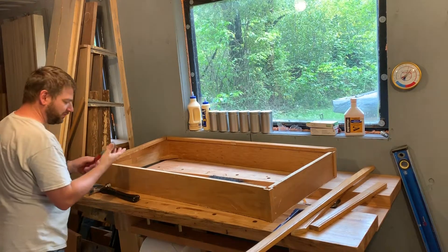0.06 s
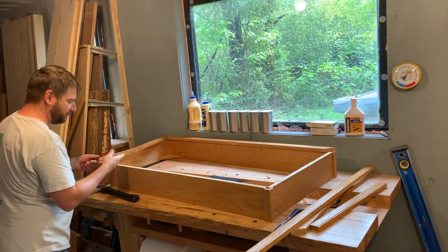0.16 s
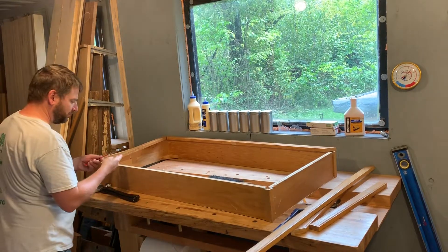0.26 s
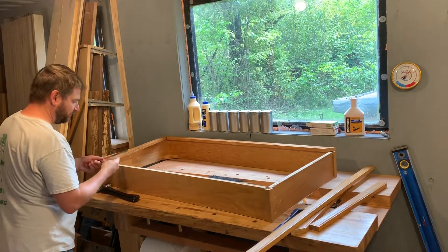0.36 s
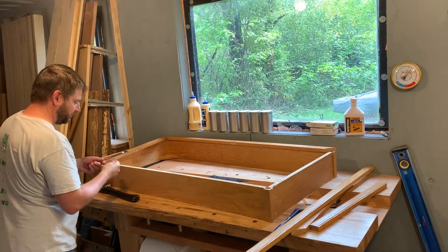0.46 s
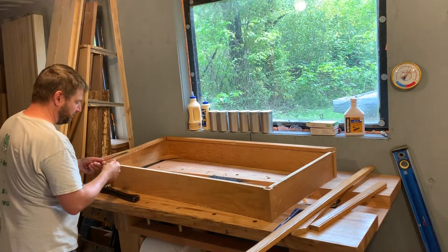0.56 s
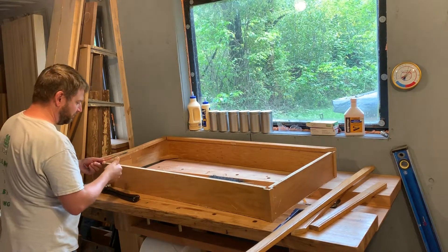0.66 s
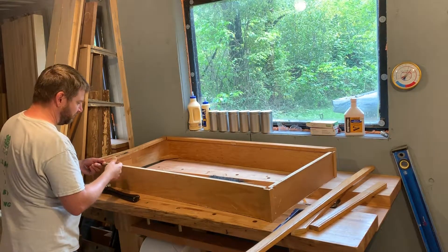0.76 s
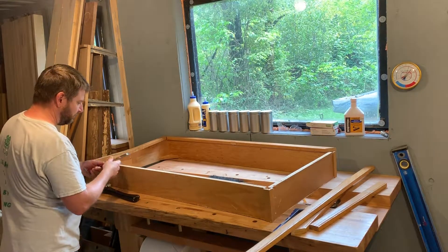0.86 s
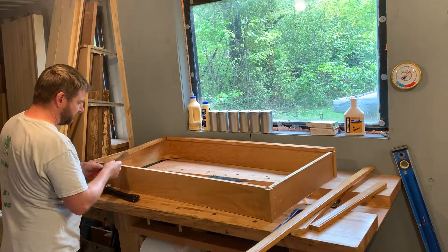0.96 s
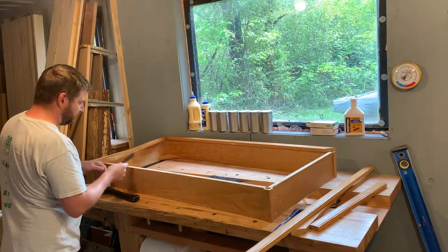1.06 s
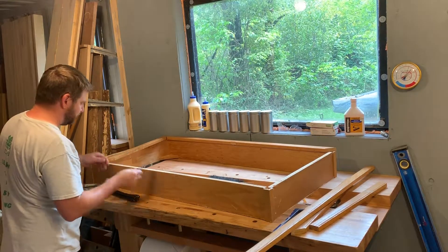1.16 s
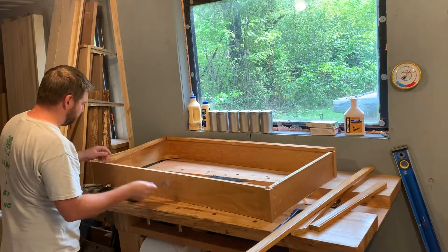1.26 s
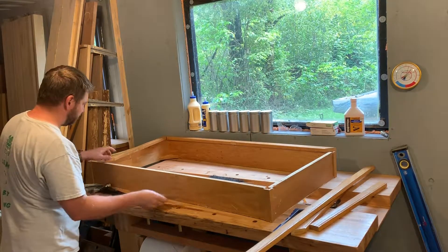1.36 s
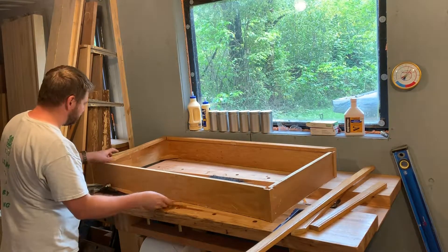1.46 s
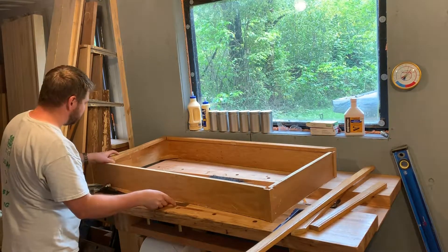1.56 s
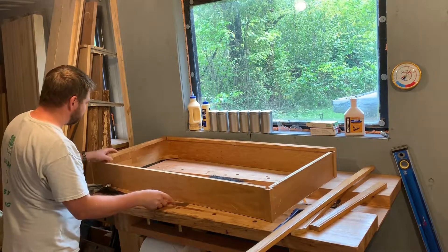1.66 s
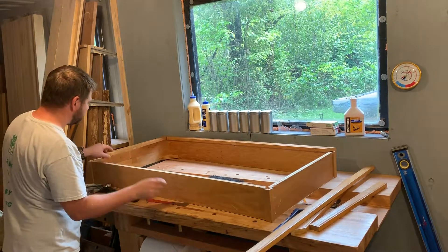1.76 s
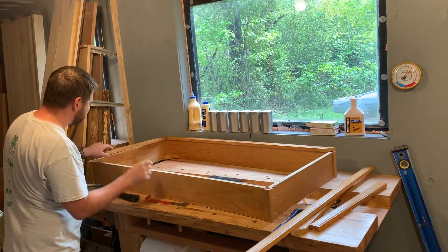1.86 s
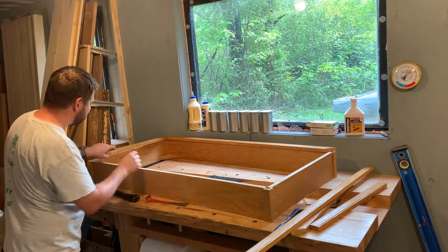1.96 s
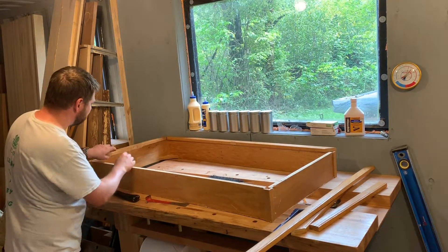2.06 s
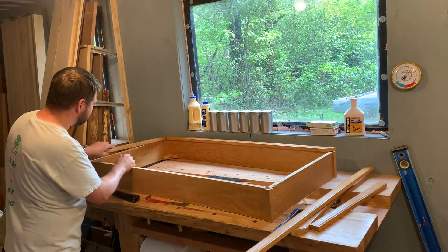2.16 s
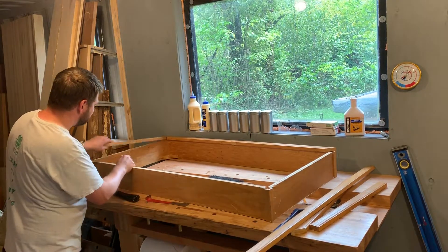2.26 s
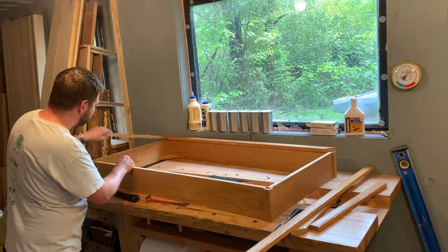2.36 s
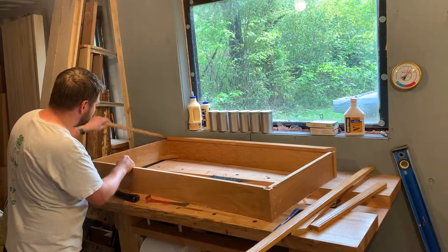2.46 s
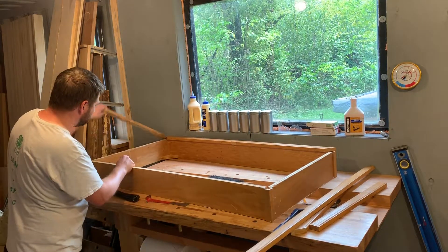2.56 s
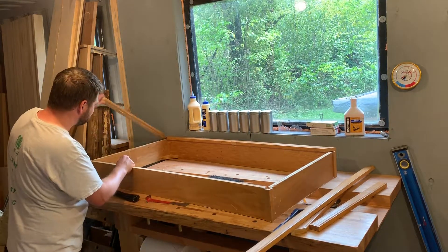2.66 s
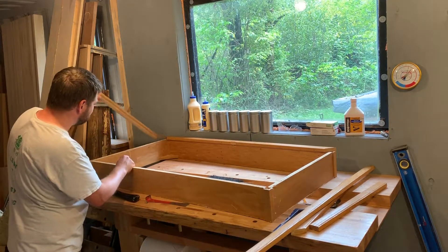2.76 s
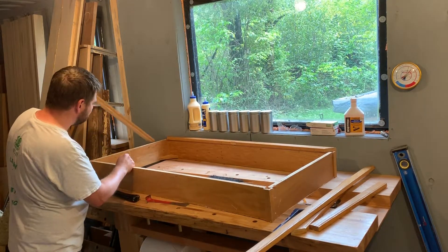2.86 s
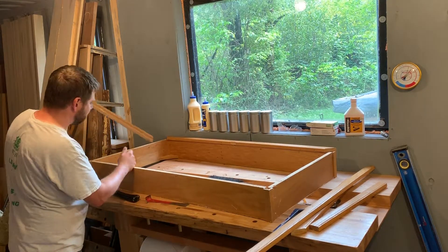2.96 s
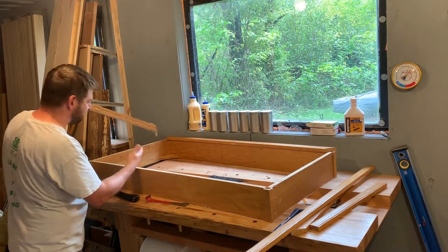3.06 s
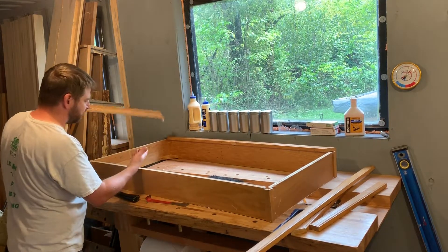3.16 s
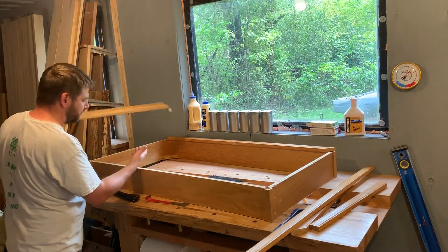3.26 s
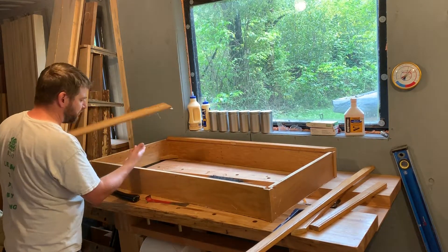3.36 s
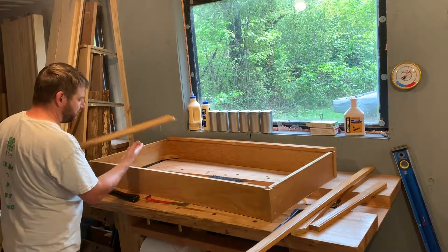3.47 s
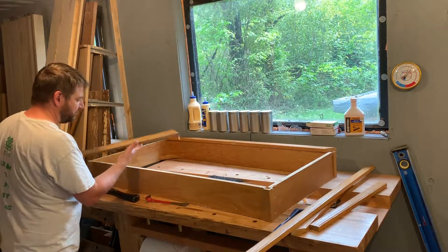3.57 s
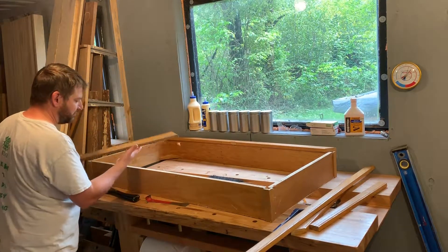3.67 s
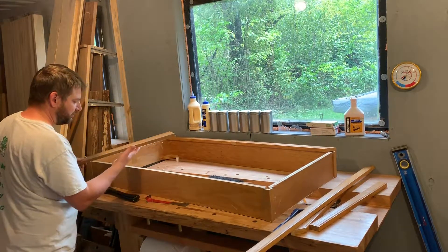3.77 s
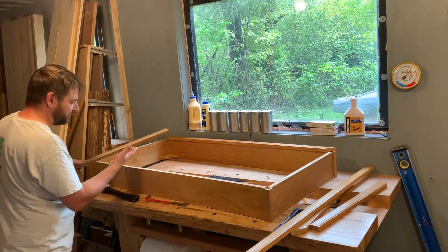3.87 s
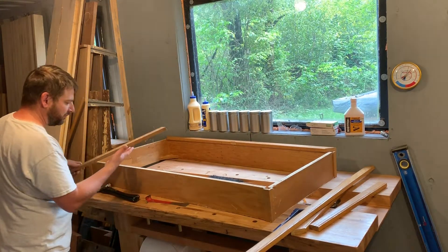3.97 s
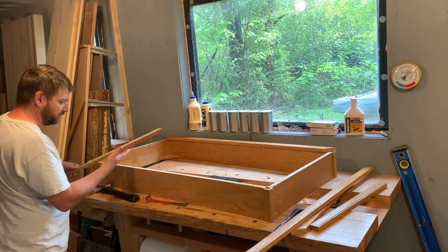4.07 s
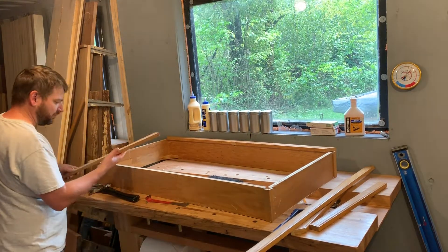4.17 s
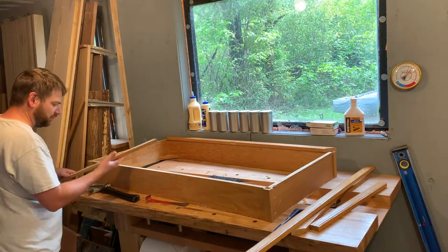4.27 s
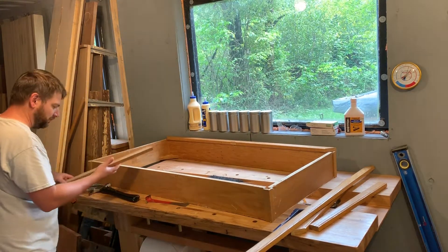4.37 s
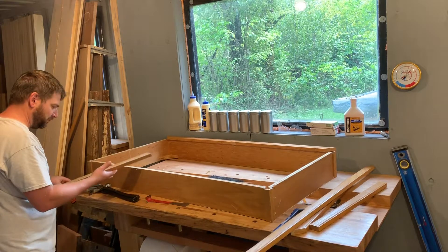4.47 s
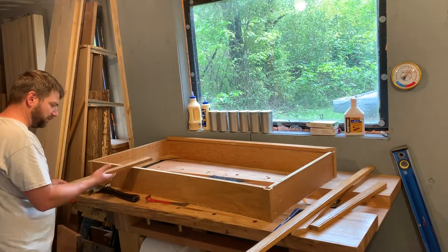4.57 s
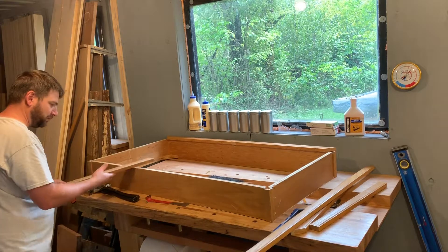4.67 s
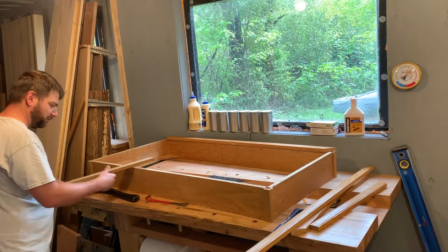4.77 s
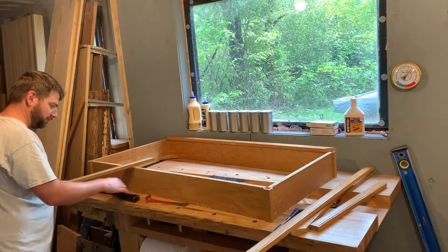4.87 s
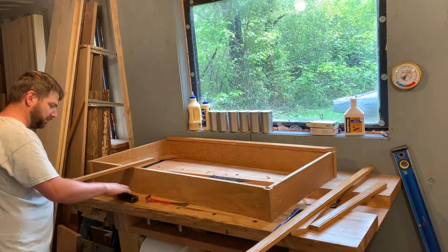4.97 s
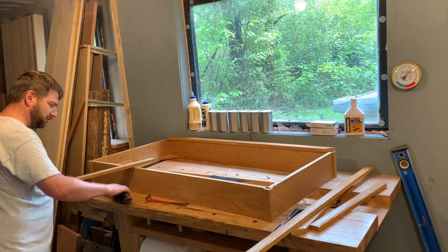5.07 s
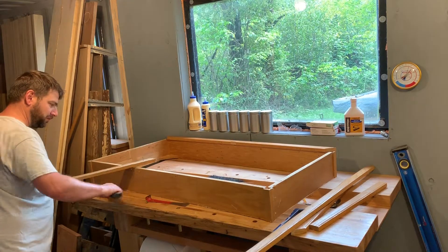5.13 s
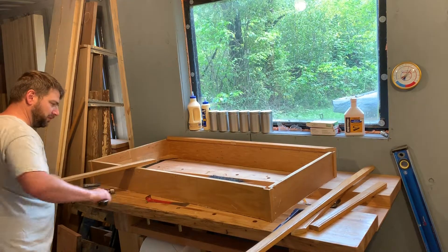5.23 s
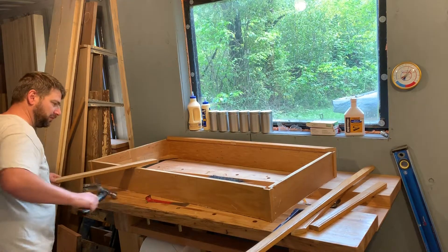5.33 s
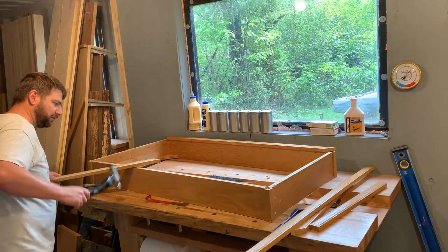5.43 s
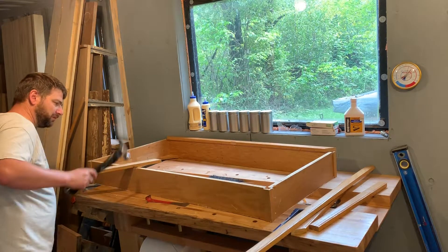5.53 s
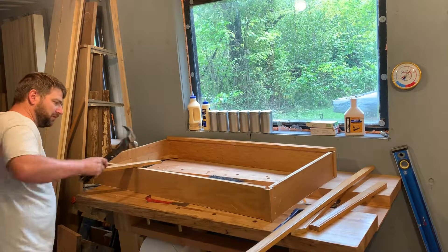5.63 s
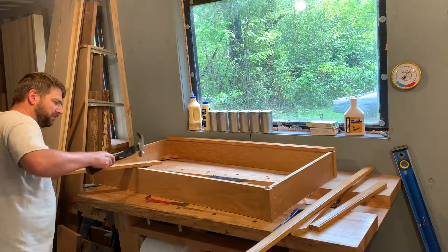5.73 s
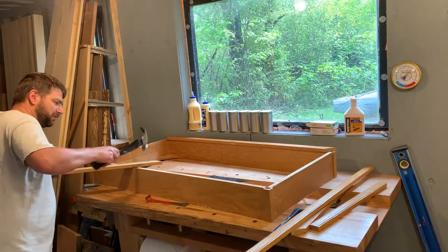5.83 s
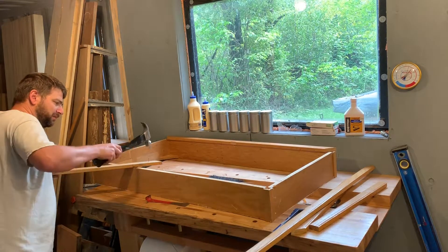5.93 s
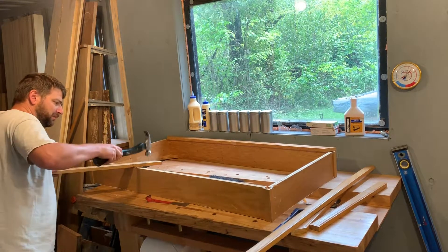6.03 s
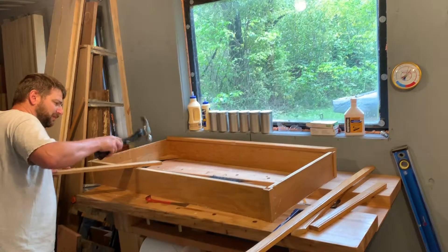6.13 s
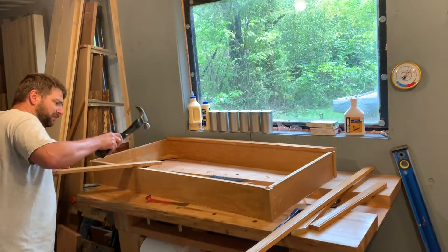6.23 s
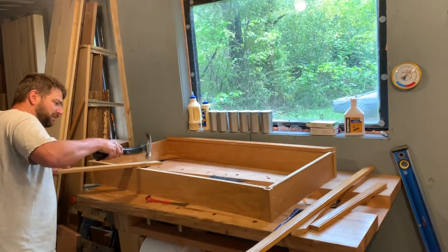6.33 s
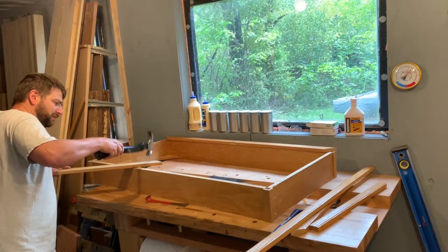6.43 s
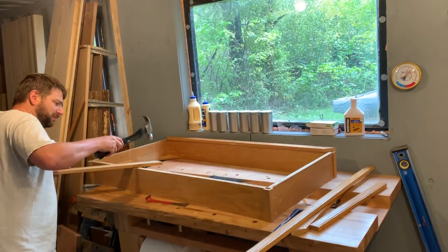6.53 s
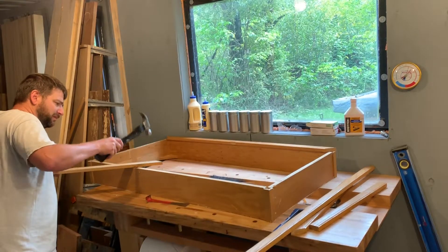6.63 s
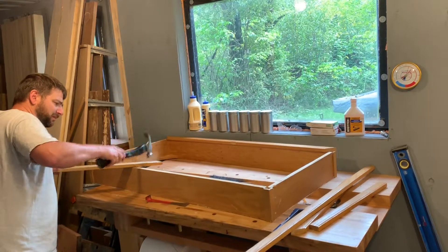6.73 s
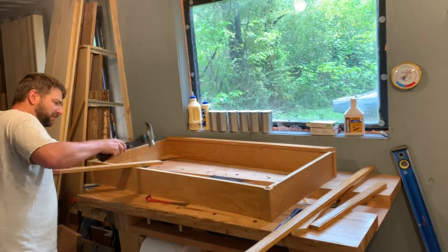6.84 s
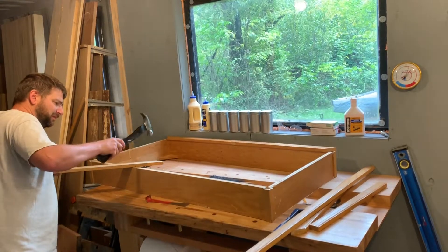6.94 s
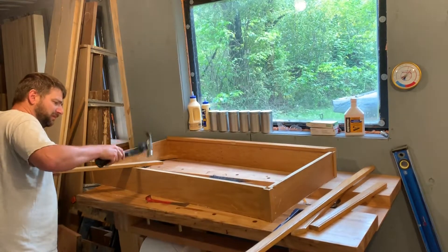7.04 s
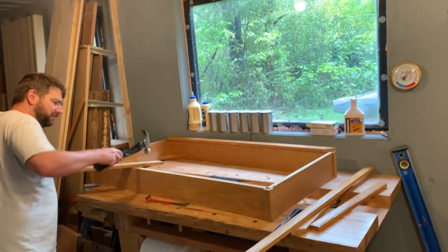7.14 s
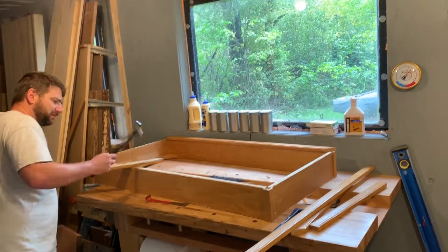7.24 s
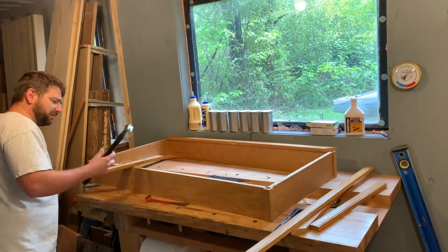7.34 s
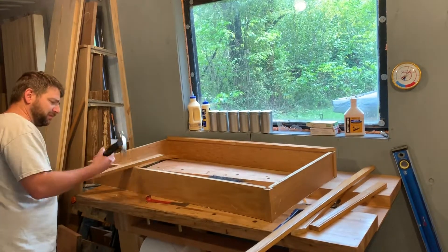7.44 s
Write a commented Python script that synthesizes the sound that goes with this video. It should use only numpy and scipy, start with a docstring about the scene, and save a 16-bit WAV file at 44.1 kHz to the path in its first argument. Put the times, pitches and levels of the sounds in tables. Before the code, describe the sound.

Close in a small workshop: metal clinks down, light wood scrapes and bumps, then hard, spaced hammer blows crack against a boxy wooden panel.

```python
"""A small workshop, close to the bench: a steel bar is laid down, wooden trim knocks and slides on an old box,
then a hammer strikes four times. Knocks are noise dying band by band plus damped panel modes and notes; steel
and the swaying bench are damped modes; sliding, shuffling and hush are coloured noise. Left and right are alike
in the bass; higher up their likeness varies and their phases differ."""
import sys
import numpy as np
from scipy.fft import rfft, irfft, next_fast_len
from scipy.io import wavfile
from scipy.ndimage import uniform_filter1d, minimum_filter1d, map_coordinates

SR = 44100
rng = np.random.default_rng(int(sys.argv[2]) if len(sys.argv) > 2 else 0)


def generate_wav(signal):
    """Clip the signal to [-1, 1] and save it as 16-bit WAV at the path in sys.argv[1]."""
    frames = np.transpose(np.atleast_2d(signal))
    scaled = np.clip(frames, -1, 1) * 32767
    pcm = np.round(scaled).astype(np.int16)
    wavfile.write(sys.argv[1], SR, pcm)


N = 330750

# panels of the box: (frequency [Hz], relative level [dB], base 60 dB decay [s])
PANEL_MODES = [(241.4, -1, 0.25), (302, -5, 0.19), (333, 1, 0.16), (385, -2.5, .28), (425, -8.5, 0.33),
               (466, -7.5, 0.1264), (594, -6.5, 0.31), (629.6, 1.5, 0.14), (771, -8.5, 0.24),
               (893, -10.5, 0.22), (1010, -10, .15)]
# noise bands of a knock: (centre [Hz], relative level [dB], base 60 dB decay [s], base rise [s]);
# each knock scales the decay and rise
KNOCK_BANDS = [(40, -7.5, 1, 0.035), (80, -0.5, 0.92, .025), (152, -4.5, 0.38, .015),
               (300, -2, 0.36, 0.0074), (674.3, -4, 0.35, 0.0035), (1280, -7, 0.36, 0.0017),
               (2510, 1, 0.38, 0.0033), (4860, -4, 0.37, 0.006), (7407, -4, .32, .001),
               (11460, -1.5, 0.269, 0.00039), (16180, -14, .2, .001)]
# hammer blows: (time [s], crack [dB], bite re crack [dB], snap re crack [dB], body re crack [dB],
#   low note [Hz], low note re body [dB], high note [Hz], share of the base decay [1],
#   rebound level [dB], bench jolt level [dB], sway that answers most [Hz], head ring level [dB])
HAMMER_BLOWS = [(6.0602, -9, -8, -17.5, -2.5, 301, -3, 2403, .76, -18, -6, 108, -2.5),
                (6.3855, -12, -5, -3.5, 4, 621, 7, 2138, .8, -18, -8, 108, -6.5),
                (6.757, -5, -3.5, -12, -.5, 582, 3, 3136, .81, -17, -5, 54.5, 1),
                (7.1087, -7.5, -2, -20, -4, 393.3, 1, 2421, .96, -15, -7, 105, 12)]


def amp(db):
    """Decibels to amplitude."""
    return np.exp(np.asarray(db) * np.log(10) / 20)


def unit(x):
    """Scale each signal to rms 1."""
    return x / np.sqrt(np.mean(x ** 2, axis=-1, keepdims=True) + 1e-20)


def along(points, hz):
    """Read (Hz, value) points on a log frequency axis."""
    f, value = np.transpose(points)
    return np.interp(np.log(hz + 1), np.log(f + 1), value)


def curves(rows):
    """One value per sample for each column after the time."""
    s, *columns = np.transpose(rows)
    return [np.interp(np.arange(N) / SR, s, column) for column in columns]


def wobble(rate):
    """A smooth random curve, rate knots a second."""
    knots = rng.standard_normal(int(N * rate / SR) + 4)
    return map_coordinates(knots, [np.arange(N) * rate / SR])


def filtered(x, response):
    """x through a complex response of frequency."""
    n = x.shape[-1]
    m = next_fast_len(n + 4096)
    return irfft(rfft(x, m) * response(np.fft.rfftfreq(m, 1 / SR)), m)[..., :n]


def noise(spectrum):
    """Two unrelated coloured noises of rms 1."""
    white = rng.standard_normal((2, N))
    return unit(filtered(white, lambda hz: amp(along(spectrum, hz))))


def ring(modes, t, scatter_db, spread=1):
    """Damped modes at new strengths, starting over a cycle, on two paths; phases span a share of a turn."""
    hz, db, t60 = np.transpose(modes)[:, :, None]
    strength_db = db + scatter_db * rng.standard_normal(db.shape)
    size = amp(strength_db - 60 * t / t60) * (1 - np.exp(-6 * t * hz))
    phase = spread * rng.uniform(0, 2 * np.pi, (2, len(modes), 1))
    return (size * np.sin(2 * np.pi * hz * t + phase)).sum(1)


def favour(modes, hz, db_per_octave):
    """The modes, weaker the further they lie from hz."""
    return [(f, db - db_per_octave * abs(np.log2(f / hz)), t60) for f, db, t60 in modes]


def add(out, s, sound):
    """Mix a sound in at s seconds."""
    at = round(s * SR)
    out[:, at:at + sound.shape[1]] += sound


def room_tone():
    """Low rumble and woody shuffling through the bench over a faint hush, each an unsteady noise."""
    # the bench under the hands: (time [s], rumble level [dB], wood level [dB]), before the flutter
    shuffle = [(0, -60, -82), (.2, -59, -75), (.6, -68, -81), (1.2, -67.5, -81), (1.46, -64, -70),
               (1.6, -51, -50), (1.8, -51, -64), (1.9, -59, -80), (2.2, -55, -67), (2.4, -61, -70),
               (2.7, -53.5, -64), (2.95, -59, -74), (3.15, -70, -81), (3.72, -70, -79), (4.03, -61, -76),
               (4.2, -65, -74), (4.58, -63, -74), (4.63, -52, -59), (4.85, -55, -65), (5.04, -51, -64),
               (5.25, -51.5, -46), (5.4, -54.5, -54), (5.7, -58, -62), (5.82, -73, -82), (6.05, -72, -70)]
    # spectra: (frequency [Hz], relative density [dB])
    rumble_spectrum = [(8.8, -36), (15, -10), (44, -1.5), (70, -11.5), (108, -11.5), (161, -32.5),
                       (200, -27.5), (260, -52.5), (440, -120)]
    # (frequency [Hz], relative density [dB])
    wood_spectrum = [(88, -33.5), (150, -3), (195, 0), (314, 0.5), (398, -4), (463, -15), (560, -7),
                     (626, -16.5), (1000, -25.5), (1300, -50.5), (2200, -120)]
    # (frequency [Hz], relative density [dB])
    hush_spectrum = [(290, -44), (500, -0.5), (1000, -8), (3000, -9), (8300, -13.5), (12000, -18.5),
                     (16500, -23.5)]
    rumble_db, wood_db = curves(shuffle)
    rumble = amp(rumble_db + 2.4 * wobble(9.5)) * noise(rumble_spectrum)
    wood = amp(wood_db + 2.5 * wobble(27)) * noise(wood_spectrum)
    hush = amp(-77.5 + 1.2 * wobble(12)) * noise(hush_spectrum)
    return rumble + wood + hush


def handling():
    """Sliding wood and skin catch unevenly; each stroke swells 20 dB to full contact, holds and trails off."""
    # strokes of hands and trim: (full contact [s], rise over 20 dB [s], hold [s], fall over 20 dB [s],
    #   level [dB], treble re rub [dB])
    strokes = [(.17, .07, .04, .07, -61, -3.5), (.63, .03, .04, .06, -87, 8.5),
               (2.0, .03, 0.058, 0.84, -69, -18), (3.572, .02, .001, 0.06, -71, .1),
               (3.95, 0.095, .015, .08, -64.5, -2.5), (4.27, .2, .001, .3, -70, -10),
               (4.58, .015, .09, .06, -50, -10), (5.04, 0.082, .02, .1, -70, -16),
               (5.21, .05, .1, .12, -58, -26), (5.275, .008, .001, .04, -66, 8),
               (5.412, .008, .001, .2, -55, -14.5), (5.757, .004, .001, .03, -74, 6),
               (5.864, .004, .001, .03, -74, 6)]
    # the rub: (frequency [Hz], relative density [dB])
    grain_spectrum = [(350, -30), (600, -7), (760, -3), (842, -7), (1440, -7), (1860, -10.5), (2100, -7.5),
                      (7000, -19.5), (9100, -49.5), (15400, -120)]
    # the treble: (frequency [Hz], relative density [dB])
    fizz_spectrum = [(4000, -38.5), (6500, -1.5), (11000, 1), (15000, -3.5), (16500, -10)]
    t = np.arange(N) / SR
    rub, fizz = np.zeros((2, N))
    for s, rise, hold, fall, db, treble_db in strokes:
        away = np.maximum((s - t) / rise, (t - s - hold) / fall)
        stroke = amp(db - 20 * np.clip(away, 0, None))
        rub = rub + stroke
        fizz = fizz + amp(treble_db) * stroke
    catch = unit(amp(2.0 * wobble(60) + 2.3 * wobble(270)))
    return catch * (rub * noise(grain_spectrum) + fizz * noise(fizz_spectrum))


def bench():
    """Each landing pushes all sways of the bench nearly in phase, the nearest most, over a dull boom."""
    # sways of the bench: (frequency [Hz], relative level [dB], 60 dB decay [s])
    sways = [(51, 0.5, 0.15), (60.3, -7.5, 0.26), (76, -1.5, 0.21), (94.7, 2, 0.25), (116.3, -6.5, 0.26),
             (163.6, -9.5, 0.27)]
    # the box lands: (time [s], relative level [dB], sway that answers most [Hz], boom re level [dB])
    thuds = [(1.479, -40, 99.6, -9), (1.628, -33.5, 75.4, -9), (2.173, -39, 102.6, -9),
             (2.568, -32, 90, -1), (2.63, -34, 83.4, -8), (2.9, -38, 108.6, -5), (2.944, -32, 117.6, -18),
             (3.006, -35, 105.4, -18), (4.69, -33, 64.4, -1), (4.743, -33, 88, -12), (5.075, -41, 60, -9),
             (5.215, -42, 159.3, -8), (5.275, -42, 80, 2), (5.666, -43, 110.9, -1), (6.805, -10.5, 48, -16)]
    # (frequency [Hz], relative density [dB])
    boom_spectrum = [(16, -25), (33, 1), (80, -1), (150, -10), (260, -30), (500, -120)]
    jolt_s, jolt_boom_db = .024, -11  # delay after a hammer blow; boom re the jolt
    landing_s, boom_rise_s, boom_t60 = .005, .022, .55
    out, boom = np.zeros((2, N + SR)), np.zeros((1, N + SR))
    t = np.arange(SR // 2) / SR
    jolts = [(blow[0] + jolt_s, *blow[-3:-1], jolt_boom_db) for blow in HAMMER_BLOWS]
    for s, db, hz, boom_db in thuds + jolts:
        push = amp(db - 4) * (1 - np.exp(-t / landing_s))
        sway = ring(favour(sways, hz, db_per_octave=7), t, scatter_db=3, spread=.045)
        add(out, s, push * sway)
        boom_fade = amp([db + boom_db - 60 * t / boom_t60])
        add(boom, s, boom_fade * (1 - np.exp(-t / boom_rise_s)) ** 2)
    return out[:, :N] + boom[:, :N] * noise(boom_spectrum)


def steel():
    """Contacts ring the bar's damped modes; the hammer head sings after its blows; the bar lying on the bench
    jingles when jostled."""
    # contacts of the bar: (time [s], relative level [dB], modes under 6 kHz re the higher ones [dB])
    clinks = [(1.4755, -44, -14), (1.5643, -14.5, -9), (1.6227, -13, -5.5), (1.6444, -11, 1),
              (1.6644, -16.5, 2)]
    # the bar: (frequency [Hz], relative level [dB], 60 dB decay [s])
    bar_modes = [(2627, -24, .22), (4748, -24, .3), (4875, -11, .47), (5435, -26, .28), (6300, -20, .15),
                 (7270, -20, .2), (7685, 0, .25), (9010, -18, .1), (9320, -12, .09), (10280, -14, .15),
                 (10750, -10, .16), (11280, -12, .2), (12545, -14, .08), (15320, -14, .12)]
    # the hammer head: (frequency [Hz], relative level [dB], 60 dB decay [s])
    head_modes = [(6300, -61, 0.77), (6291, -60.5, 1.3), (3440, -36, 0.37), (3490, -37.5, 0.44),
                  (4840, -44.5, 0.42), (5000, -38.5, .3)]
    # the bar lying on the bench is jostled: (time [s], level [dB], mode that answers most [Hz])
    jingles = [(2.0, -66, 1860), (2.045, -65, 3770), (2.965, -52, 2600), (3.03, -51, 2600),
               (5.011, -59.5, 1844), (5.028, -55.5, 3780), (5.664, -68, 2620), (5.74, -68, 2630),
               (5.839, -62.5, 2350)]
    # the bar as it lies on the bench: (frequency [Hz], relative level [dB], 60 dB decay [s])
    lying_bar_modes = [(1963, -0.5, 0.2), (1906, -12.5, 0.14), (2330, -2, 0.14), (2640, -5, 0.3),
                       (2640, -12, 0.23), (3440, -24, 0.086), (3550, -11, 0.079), (3840, -7, 0.23)]
    out, t = np.zeros((2, N + SR)), np.arange(SR // 2) / SR
    for s, db, low_db in clinks:
        modes = [(hz, level + low_db * (hz < 6000), t60) for hz, level, t60 in bar_modes]
        add(out, s, amp(db - 10.5) * ring(modes, t, scatter_db=1.5))
    for s, *_, head_db in HAMMER_BLOWS:
        add(out, s, amp(head_db) * ring(head_modes, t, scatter_db=2))
    t = t[:SR // 5]
    for s, db, hz in jingles:
        jingle = ring(favour(lying_bar_modes, hz, db_per_octave=14), t, scatter_db=2)
        add(out, s, amp(db) * (1 - np.exp(-t / .006)) * jingle)
    return out[:, :N]


def linger():
    """After each hammer blow the panels ring on faintly, with five times their base decay."""
    out, t = np.zeros((2, N + SR)), np.arange(SR // 2) / SR
    after = [(hz, db, 5 * t60) for hz, db, t60 in PANEL_MODES]
    for s, db, *_ in HAMMER_BLOWS:
        add(out, s, amp(db - 35) * np.cos(np.pi * t) * ring(after, t, scatter_db=4))
    return out[:, :N]


def contacts():
    """All knocks, with each hammer blow and its rebound, as the trim slaps back."""
    # trim and bar on wood: (time [s], crack [dB], bite re crack [dB], snap re crack [dB],
    #   body re crack [dB], low note [Hz], low note re body [dB], high note [Hz], share of the base decay [1])
    wood_knocks = [(1.4114, -54.5, -4, -21, 9, 230, 11, 1940, 1),
                   (1.4338, -52, -2.5, -17, 5.5, 655, 5, 1840, 1),
                   (1.4795, -28.5, -25, -25, 0.1, 360, 2.5, 2140, 0.79),
                   (1.566, -32, .5, -.5, -0.5, 576, 1.5, 4750, 1),
                   (1.5948, -24, -9, -9.5, .5, 694, 4, 2910, 0.88),
                   (1.6236, -18.5, -4, -6, -11.5, 366, 1, 2020, 0.6),
                   (1.6444, -24, -12, 3.5, -7.5, 563, .1, 4900, 0.81),
                   (2.0175, -61.5, -17, -34, 10.5, 369, -2, 1820, 0.81),
                   (2.0809, -63, -2.5, -16, 5.5, 560, 15, 2126, 0.97),
                   (2.154, -44, -13, -33, -1, 350, -4, 1920, 0.72),
                   (2.211, -41, -5.5, -8.5, -8.5, 672, 7, 1920, 0.53),
                   (2.2593, -65, 15, 7.5, 13, 221, -5, 3220, 1),
                   (2.2993, -42, 1, -3, .1, 670, 7.5, 4040, 0.94),
                   (2.3233, -38, -6.5, .5, -0.5, 360, 6.5, 1890, 0.34),
                   (2.5665, -48, -5, -17, 5.5, 259, 6.5, 1870, 0.71),
                   (2.8976, -53, -7, -26, 8, 330, 12, 1815, .72),
                   (2.9487, -53, -3.5, -19, 15.5, 604, 3, 1965, 0.98),
                   (2.9741, -44, -8, -25, .5, 621, 14, 2190, 0.69),
                   (3.0031, -35.5, -10.5, -21, -1.5, 619, 13, 1780, 0.6),
                   (3.0301, -40, -23, -22, -15, 299, 2.5, 2620, 0.63),
                   (3.5656, -66, -6.5, -11, -3.5, 319, 15, 1830, 0.69),
                   (4.6804, -36, -7, -20, 10, 256, 6.5, 2940, 0.65),
                   (5.0534, -56, -11, -23, 8, 322, 4, 1840, .55),
                   (5.1763, -64, -13, .1, 21, 233, -9, 2300, 1),
                   (5.213, -44.5, -27, -26, 10.5, 320, 8.5, 2280, 0.75),
                   (5.2716, -46.5, -13, -15, 14, 309, 3.5, 2656, 1),
                   (5.4096, -54.5, -12, -25, -12, 242, 17, 1810, 0.94),
                   (5.5459, -65, -5, -19, 10.5, 251, 18, 2820, 0.29),
                   (5.6582, -62, -18, -8, 16.5, 310, 7, 1917, .5),
                   (6.8038, -16, -4, -18, -2.5, 282, -.5, 2210, 0.79)]
    rebound_s = .0285
    rebound = (-5, -17, .1, 380, .1, 2398.5, .82)  # the same columns from bite on
    blows = [blow[:-4] for blow in HAMMER_BLOWS]
    rebounds = [(blow[0] + rebound_s, blow[-4], *rebound) for blow in HAMMER_BLOWS]
    return wood_knocks + blows + rebounds


def knock_noise():
    """Noise through the box's high resonances and dense small random modes, in overlapping bands of rms 1."""
    # high resonances of the box: (frequency [Hz], width [Hz], level before a rising treble tilt [dB])
    resonances = [(1640, 750, -1), (2390, 45, -6.5), (2800, 51.5, -7.5), (2780, 140, -7.5), (3540, 33, -4),
                  (4492, 54, -14.5), (4670, 950, 2.5), (5820, 27, -26), (6530, 97, -24.5), (7400, 92, -18),
                  (7626, 37, -15.5), (7500, 64, -17), (8110, 210, -12.5), (8700, 450, -16)]
    centres = np.transpose(KNOCK_BANDS)[0]
    index = np.arange(len(centres))

    def split(f):
        place = np.interp(np.log(f + 1), np.log(centres), index)
        return np.clip(1 - abs(place - index[:, None]), 0, 1) * (f > 18)

    def peaks(f):
        return 1 + 1.7 * sum(amp(db + f / 450) * width / np.hypot(width, 2 * (f - hz))
                             for hz, width, db in resonances)

    def dense(f):
        ripple = uniform_filter1d(rng.standard_normal(len(f)), size=100)
        return amp(3.5 * unit(ripple))

    white = rng.standard_normal((2, 2 * SR))
    coloured = filtered(white, lambda f: peaks(f) * dense(f))
    return unit(filtered(coloured[:, None], split))


def knocks():
    """Each knock: rattling noise dying band by band, panel modes and the loose piece's two notes."""
    out, bank = np.zeros((2, N + SR)), knock_noise()
    hz, band_db, t60, rise = np.transpose(KNOCK_BANDS)[:, :, None]
    crack = 3 * (hz > 2000) * amp(-60 * np.arange(SR) / SR / 0.004)  # the first hard touch, treble only
    rattle = amp(1.5 * wobble(90))  # loose trim chatters on after the blow
    for s, db, bite_db, snap_db, panel_db, low_hz, low_db, high_hz, lasts in contacts():
        boom_db = panel_db - 11
        soft = .8 - .006 * db  # lighter contacts rise slower
        t = np.arange(round(.42 * SR * min(lasts, 1.3))) / SR
        colour = [(120, boom_db), (250, panel_db), (700, panel_db), (1300, 0), (2000, 0),
                  (3000, bite_db), (5500, bite_db), (8000, snap_db)]
        swell = (1 - np.exp(-t / (soft * rise))) ** 2
        room_tail = amp(-60 * t / (lasts * t60))
        direct = 1.2 * amp(-60 * t / (0.12 * t60))
        late_tail = amp(-33.5 - 60 * t / (1.7 * t60)) * np.cos(np.pi / 2 * t / t[-1])
        fade = room_tail + direct + late_tail
        shape = amp(along(colour, hz) + band_db - 5.5) * swell * (fade + crack[:, :len(t)])
        at = rng.integers(SR)  # a fresh stretch of noise and rattle
        body = np.einsum('bt,cbt->ct', shape, bank[..., at:at + len(t)])
        panels = amp(-10.5) * (1 - np.exp(-t / (0.0025 * soft))) * ring(PANEL_MODES, t, scatter_db=5)
        low = ring([(low_hz, low_db, .06)], t, scatter_db=2.0, spread=0.13)
        low = (1 - np.exp(-t / 0.0014)) * low
        cluster = high_hz * (1 + 0.021 * rng.standard_normal(4))  # close modes beat into a rough note
        high = ring([(f, -12, 0.19 * lasts) for f in cluster], t, scatter_db=4.5)
        wooden = amp(panel_db) * (panels + low)
        add(out, s, amp(db) * (body * rattle[at:at + len(t)] + high + wooden))
    return out[:, :N]


def stereo(paths):
    """Left and right share the first path and split on the second, their phase difference stepping by
    half turns in the treble."""
    # (frequency [Hz], left-right likeness before the phase difference [1])
    alike = [(60, 0.9956), (250, 0.9097), (600, 0.42), (1500, 0.53), (4000, 0.15), (6500, 0.15),
             (7800, 0.34), (9300, 0.905), (16000, 0.97)]
    # (frequency [Hz], left phase minus right phase [half turns])
    phase_points = [(0, 0), (350, 0), (900, -.3), (1800, -.5), (2800, -1), (4500, -1), (6000, 1),
                    (7000, 2.3), (7900, 2), (9300, 1.03), (10050, .97), (11300, 0), (11800, 0),
                    (13000, -.97), (14000, -1.03), (15000, -2), (17000, -2)]
    # (frequency [Hz], left minus right [dB])
    lean = [(60, -1.5), (180, -0.5), (550, 1.5), (1650, 1.5), (4970, -1.5), (15000, 0.5)]

    def share(hz):
        angle = np.arccos(np.clip(along(alike, hz), -1, 1)) / 2
        return np.array([np.cos(angle), np.sin(angle)])

    def left_right(hz):
        half_turns = np.interp(hz, *np.transpose(phase_points))
        half = amp(along(lean, hz) / 2) * np.exp(.5j * np.pi * half_turns)  # each side takes half of both
        return np.array([half, 1 / half])

    mid, side = filtered(paths, share)
    return filtered(np.array([mid + side, mid - side]), left_right)


def scene():
    """All layers, from the room to the knocks, as left and right."""
    return stereo(room_tone() + handling() + bench() + steel() + linger() + knocks())


def record(dry):
    """A limiter holds loud blows down for a moment, peaks round off, and nothing passes above 16750 Hz."""
    need = np.minimum(1, 1.05 / (abs(dry).max(0) + 1e-9))
    held = minimum_filter1d(need, size=661, origin=220)  # looks ahead 2.5 ms, holds 12.5 ms
    limited = dry * uniform_filter1d(held, size=221)
    soft = limited / (1 + abs(limited) ** 6) ** (1 / 6)
    return filtered(soft, lambda hz: hz < 16750)


dry = scene()
out = record(dry)
generate_wav(out)
```